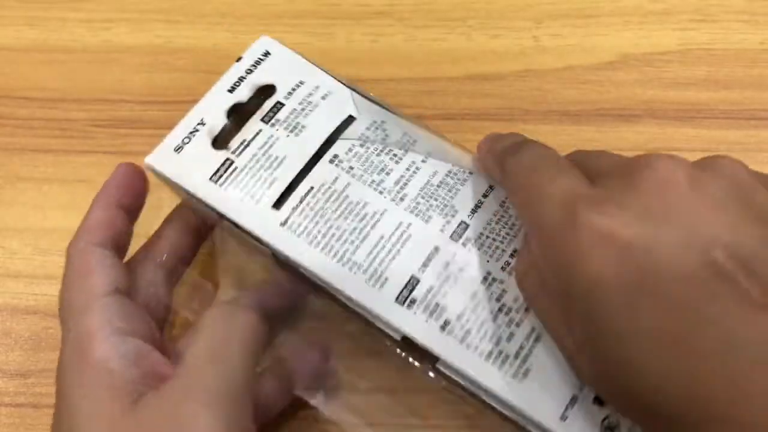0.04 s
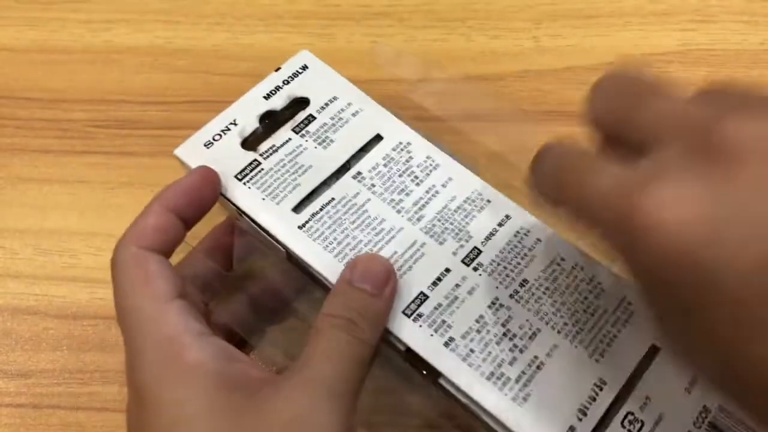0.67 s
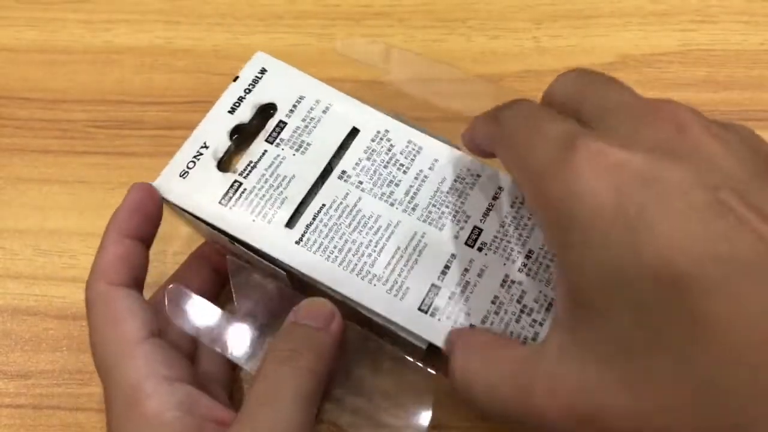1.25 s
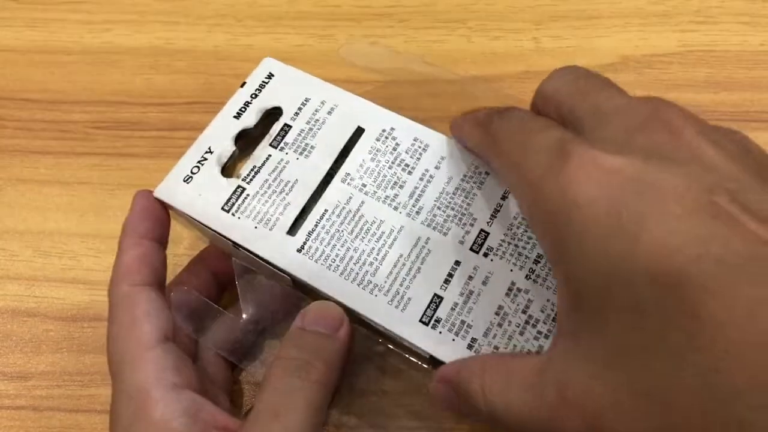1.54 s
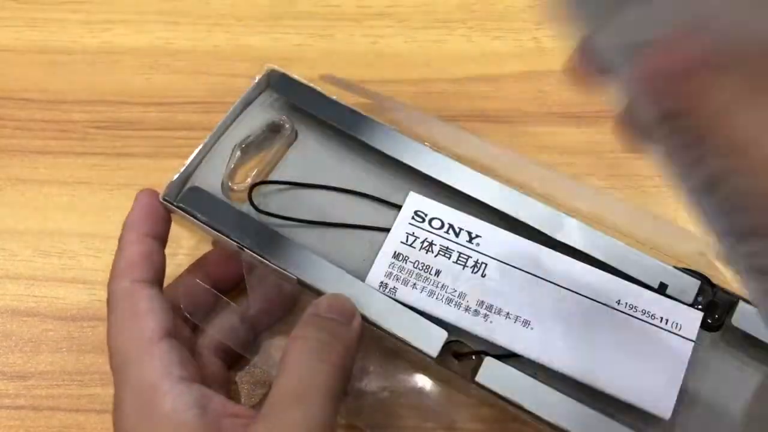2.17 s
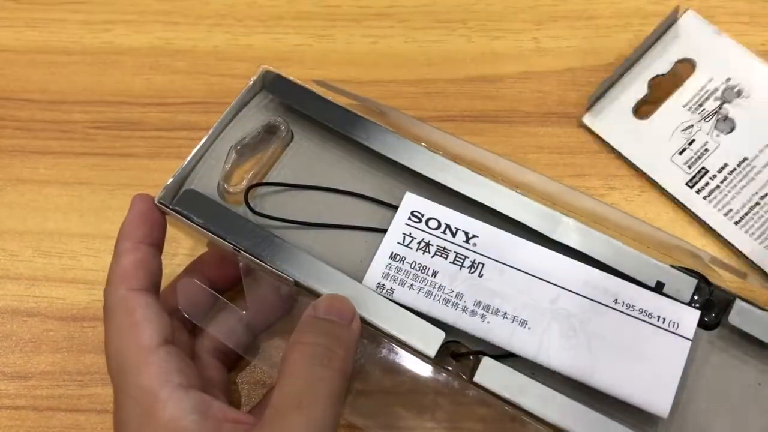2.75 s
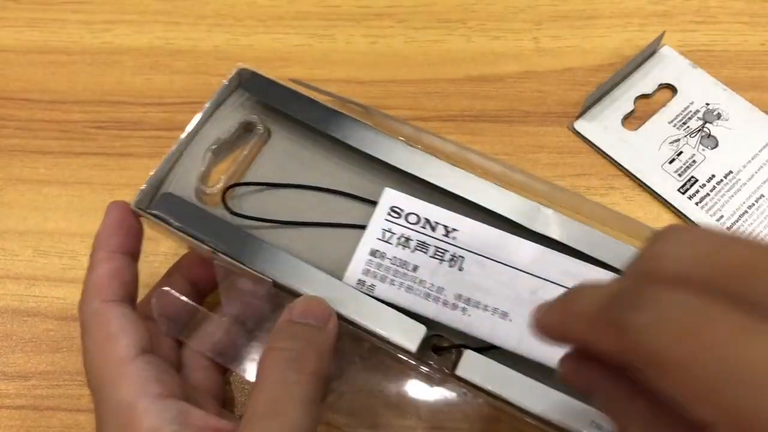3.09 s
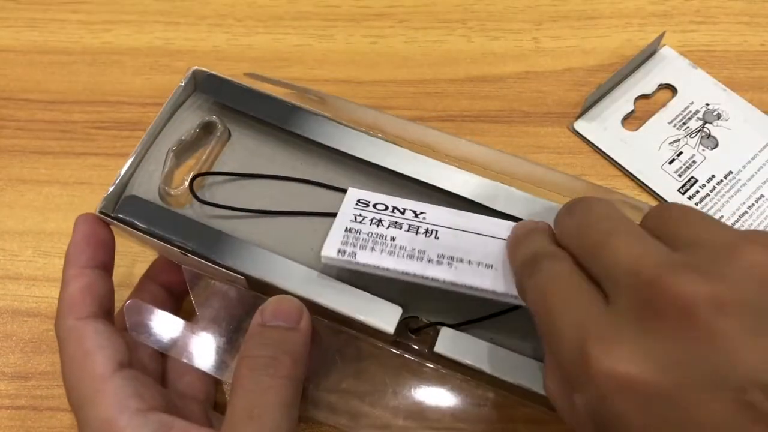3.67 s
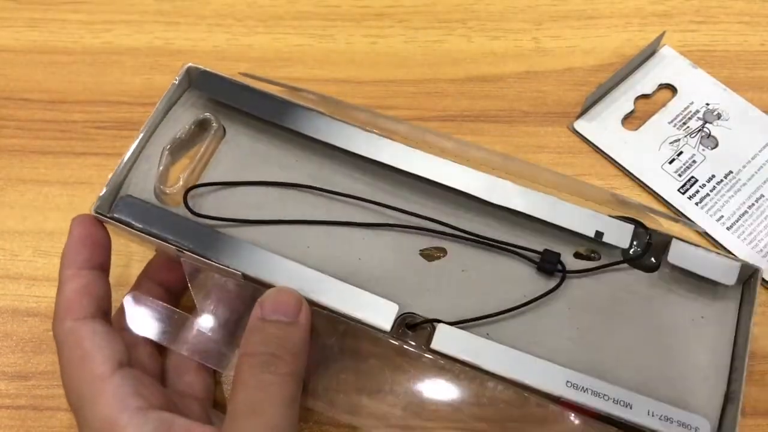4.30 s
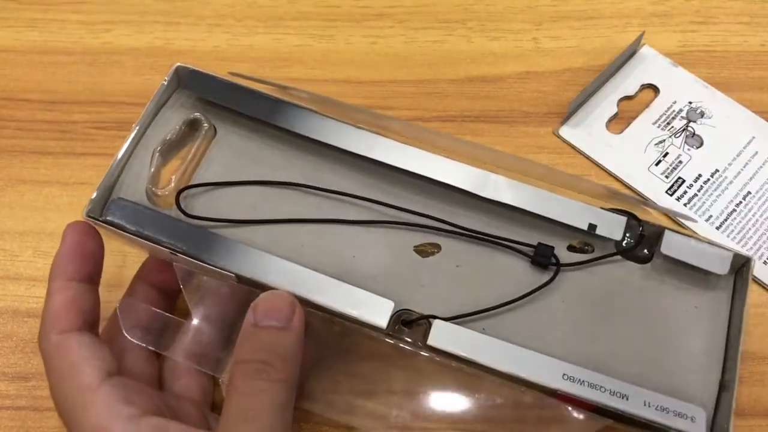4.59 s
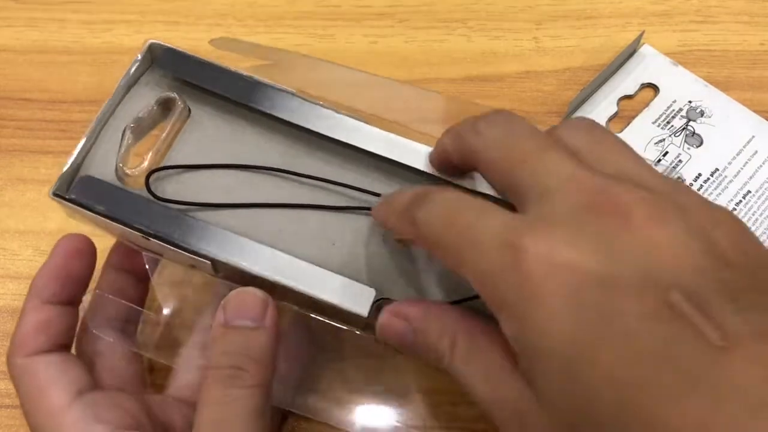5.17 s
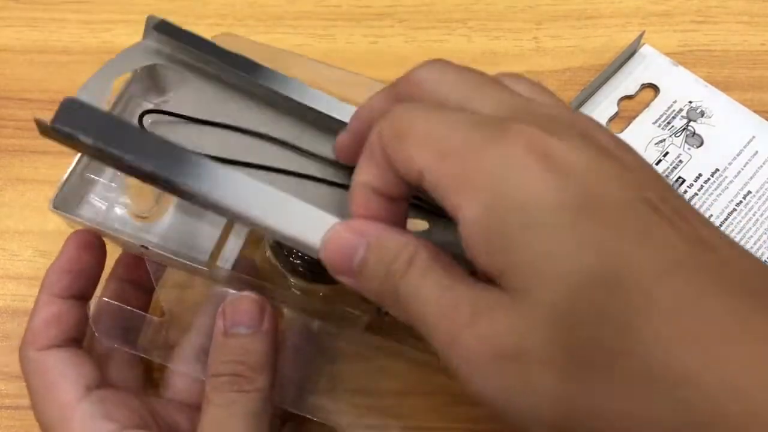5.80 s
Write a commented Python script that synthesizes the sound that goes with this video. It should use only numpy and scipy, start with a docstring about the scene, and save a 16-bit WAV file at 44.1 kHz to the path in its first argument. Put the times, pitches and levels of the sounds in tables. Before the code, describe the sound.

Hands open a stiff plastic pack on a desk, close to the microphone in a small room. For the first two seconds a backing card scrapes out in short, uneven strokes while the shell gives sharp, hollow clicks and the desk takes a few soft bumps. The loudest cluster comes at about 0.4 seconds, with a brief squeaky skid of card on plastic; another skid comes near 1.8. At 2.6 the card lands on the desk with a light slap and settles. From 3.3 to 4 a paper leaflet rustles and flicks against the tray, with crisp snaps around 3.65 and 3.8. A quieter stretch holds only faint swishes and two tiny taps. From 5 seconds to about 6, fingers tap and rub the tray, which ticks as it flexes, with a firmer knock near 5.8. Faint room rumble and mains hum continue throughout.

```python
"""Opening a blister pack, close up

A desk in a small room, one microphone close to the hands. A backing card scrapes out of a stiff plastic
shell, which clicks and rings, and is dropped aside. A paper leaflet snaps and rustles as it is lifted
out; fingers then tap and rub the tray. Faint room rumble and mains hum lie underneath."""
import sys
import numpy as np
from scipy import signal
from scipy.fft import rfft, irfft, next_fast_len
from scipy.io import wavfile
from scipy.ndimage import uniform_filter1d, map_coordinates

SR = 44100
rng = np.random.default_rng(int(sys.argv[2]) if len(sys.argv) > 2 else 0)


def inscribe(sig):
    """Save sig as 16-bit PCM at rate SR to the path in sys.argv[1].

    A 1-D sig is mono; a 2-D sig holds one channel per row.
    Samples are clipped to [-1, 1] before scaling.
    """
    pcm = np.round(np.clip(np.atleast_2d(sig).T, -1, 1) * 32767)
    wavfile.write(sys.argv[1], SR, pcm.astype(np.int16))


N = 257544

# Levels in the tables are relative: each source adds its own gains.
# room tone: f/Hz, level/dB
ROOM_TONE = [(12, -75), (20, -35), (58, -3.5), (158, -7), (255, -12.5), (337, -10), (367, -11.5),
             (410, -11), (527, -20.5), (607, -16), (923, -18), (1060, -19.5), (1150, -19.5), (1810, -24.5),
             (16000, -54.5)]
# reverberation of the small room: f/Hz, t60/s
ROOM_DECAY = [(150, 0.55), (1000, 0.66), (4000, 0.67), (9000, 0.43), (16000, .4)]
# stretches of murmur and hiss: t/s, length/s, body/dB, hiss/dB
CARD_SLIDES = [(-.02, 0.066, -46, -55.5), (.11, 0.14, -60, -65), (.315, 0.15, -48, -61),
               (.55, 0.039, -48.5, -61), (.74, 0.083, -53.5, -60), (.87, 0.063, -59, -62.5),
               (1.04, 0.055, -69, -70), (.95, 0.045, -49.5, -58.5), (1.145, .04, -51, -61),
               (1.205, 0.081, -58.5, -59.5), (1.33, .07, -66.5, -61), (1.41, 0.051, -54.5, -55),
               (1.535, .05, -55, -54.5), (1.595, 0.029, -49, -66), (1.71, 0.083, -57, -59.5),
               (1.8, .13, -51, -50), (1.98, 0.13, -65, -59), (2.085, 0.036, -49.5, -58),
               (2.24, 0.28, -89, -64.5)]  # card sliding in the shell
CARD_SKATES = [(2.595, 0.045, -55.5, -56), (2.806, 0.0099, -69, -62)]  # dropped card skating to rest on the desk
LEAFLET_RUSTLE_AND_TAILS = [(3.265, 0.12, -65.5, -59), (3.4, 0.063, -57.5, -53), (3.49, 0.097, -64, -67),
                            (3.592, 0.032, -53, -57), (3.658, 0.028, -50.5, -58.5), (3.69, 0.097, -74, -69),
                            (3.778, 0.096, -55.5, -53.5), (3.89, 0.083, -59, -66), (4.1, 0.16, -90, -64),
                            (4.3, 0.023, -85, -58), (4.365, 0.15, -80, -63)]  # paper rustle and the room's fading hiss after each snap
FINGER_RUBS = [(5.015, 0.071, -54, -67.5), (5.12, 0.05, -69, -66.5), (5.195, 0.083, -75, -59.5),
               (5.28, 0.094, -60, -57.5), (5.42, 0.029, -52, -50), (5.48, 0.03, -51.5, -79),
               (5.61, 0.033, -47, -52.5), (5.69, .06, -56.5, -55), (5.785, 0.062, -50.5, -54.5)]  # fingers rubbing the tray
# spectra of the murmur, the hisses and the sizzle: f/Hz, level/dB
RUB_BODY = [(100, -16.5), (300, -7), (600, -13.5), (950, -3), (1500, -10.5), (2200, -16), (4000, -32),
            (9000, -72)]
CARD_HISS = [(900, -14), (2000, -8.5), (3200, -1), (5200, -5), (7500, -8.5), (11000, -12), (16000, -14.5)]
PAPER_HISS = [(900, -24), (2200, -8), (4200, -4.5), (6200, -6.5), (8500, -13.5), (12000, -16),
              (16000, -17.5)]
FINGER_HISS = [(900, -12), (2000, -0.5), (3200, -5.5), (5000, 5.5), (7500, -3.5), (11000, -11.5),
               (16000, -15)]
SIZZLE = [(3000, -25), (6500, -0.5), (8500, -5), (11000, -6.5), (15500, -10.5)]
# hard contacts: t/s, nominal length/s, knock/dB, crack/dB, sizzle/dB
SHELL_CLICKS = [(.0635, 0.0013, -41, -66, -76), (.2315, 0.0012, -43.5, -45.5, -61),
                (.3225, 0.0014, -36, -41.5, -68), (.3315, 0.0011, -37.5, -40.5, -72),
                (.4037, 0.0013, -31.5, -29.5, -48), (.41, 0.0027, -38, -46, -47.5),
                (.4185, 0.0027, -24.5, -32, -52), (.4225, 0.0035, -27.5, -47, -48),
                (.576, 0.0042, -49, -49, -65), (.7154, 0.00086, -49.5, -50, -66),
                (.773, 0.0018, -34.5, -42, -64.5), (.7818, 0.0015, -40.5, -53, -67),
                (.9384, 0.0014, -39, -44, -78), (1.0312, 0.00056, -44.5, -58.5, -83),
                (1.1595, 0.004, -39.5, -51.5, -68), (1.247, 0.0031, -39.5, -62, -67.5),
                (1.3385, .0019, -58, -57, -74), (1.524, 0.0018, -35.5, -57, -73),
                (1.5555, .001, -65, -54, -66), (1.5899, 0.0051, -42, -60, -72),
                (1.607, 0.0055, -37.5, -73, -73), (1.6677, .001, -51, -59.5, -73),
                (1.751, 0.0046, -63, -50.5, -67.5), (1.895, 0.0019, -37, -50, -63),
                (1.9012, 0.0034, -48, -42.5, -49.5), (2.1275, 0.0027, -37, -45, -53)]  # card and fingers against the shell
CARD_LANDINGS = [(2.5727, 0.0011, -59, -55.5, -60), (2.5903, 0.0021, -40.5, -38, -43.5),
                 (2.8011, 0.0019, -49, -51.5, -54.5)]  # card on the desk
LEAFLET_FLICKS = [(3.266, 0.0005, -66, -62, -61), (3.2728, 0.0016, -46, -52, -60.5),
                  (3.4402, 0.0018, -46, -45, -55), (3.6502, .002, -42, -35, -47.5),
                  (3.662, 0.0055, -58, -50.5, -56.5), (3.8205, .0007, -40.5, -28.5, -39.5)]  # leaflet flicking against the tray
FINGER_TAPS = [(4.379, 0.0014, -60, -58, -69.5), (4.5232, 0.0022, -61, -59, -71),
               (5.063, .0018, -53, -60, -69.5), (5.0905, 0.0022, -48.5, -55, -68),
               (5.278, 0.0013, -53, -61, -63.5), (5.3723, 0.001, -48.5, -50.5, -63.5),
               (5.406, .0006, -42.5, -56, -81), (5.4162, 0.00087, -52, -58, -70),
               (5.5479, 0.0012, -47.5, -56.5, -76), (5.6033, 0.00079, -49.5, -56, -63),
               (5.6252, 0.003, -44, -50.5, -60), (5.6926, .002, -56, -55.5, -64.5),
               (5.7664, .0008, -53, -49.5, -64), (5.8315, 0.004, -34, -48, -71)]  # fingertips on the opened tray
# spans in which the hands flex the shell: start/s, end/s
FLEX_SPANS = [(0.051, 2.05), (5.05, 6.3)]
# one faint tick of the flexed shell: nominal length/s, knock/dB, crack/dB, sizzle/dB
FLEX_TICK = (0.2, -57.5, -62.5, -74)
# resonances of the hollow pack, its stiff walls and the card: f/Hz, width/Hz, level/dB
HOLLOW_MODES = [(379, 186, 0), (849, 215, 2), (1003, 185, 1), (1626, 600, -2.5), (1890, 610, -5)]
SHELL_MODES = [(2290, 770, -0.5), (2850, 780, 3), (4050, 2300, -2.5), (5960, 2900, -8.5)]
TRAY_MODES = [(2180, 280, -5), (2780, 150, -1.5), (3700, 270, 2), (4220, 540, 0.5), (5650, 390, 3),
              (7370, 1100, -18.5)]
CARD_MODES = [(1740, 240, -2), (2360, 370, 2), (3450, 460, 4), (5000, 1500, -3.5)]
# soft bumps on the desk: t/s, level/dB, f/Hz
DESK_BUMPS = [(0.326, -42.5, 298), (.424, -42, 492), (.435, -36, 123), (.488, -40.5, 182), (.778, -45, 265),
              (1.159, -48.5, 398), (1.401, -49.5, 187), (1.524, -52, 439), (2.594, -45.5, 148),
              (3.653, -55, 273), (5.026, -55, 266)]
# card edge skidding along the plastic rim: t/s, length/s, level/dB, f/Hz
RIM_SKIDS = [(0.336, 0.053, -44.5, 3020), (0.372, 0.0092, -34, 2980), (0.382, 0.017, -45, 2800),
             (1.827, 0.021, -37.5, 3250), (1.839, 0.021, -34.5, 3020), (1.849, 0.046, -44, 1990)]
# skin and paper gliding over the pack: t/s, length/s, level/dB, f/Hz
GLIDES = [(1.172, 0.1, -60, 5000), (1.205, 0.053, -57, 3100), (1.38, 0.083, -65, 5000),
          (2.125, 0.081, -58, 5740), (3.06, .1, -55.5, 900), (3.312, .05, -58, 6140),
          (3.384, .12, -63, 6550), (3.585, .056, -53.5, 3950), (3.593, 0.049, -56, 5950),
          (4.415, 0.11, -62.5, 8060), (4.543, 0.037, -60.5, 4550), (5.61, .049, -46, 1210)]


def amp(db):
    """Decibels to gain."""
    return 10 ** (np.asarray(db) / 20)


def unit(x):
    """Scale to rms 1."""
    return x / np.sqrt(np.mean(x ** 2) + 1e-20)


def at_energy(x, db):
    """Scale a short sound so that its energy equals 10 ms at db."""
    return amp(db) * x * np.sqrt(SR / 100 / (np.sum(x ** 2) + 1e-20))


def along(points, hz):
    """Read (f/Hz, value) points on a log frequency axis."""
    f, values = np.transpose(points)
    return np.interp(np.log(hz + 1), np.log(f + 1), values)


def filtered(x, response):
    """Pass x through a response given as a function of frequency."""
    size = next_fast_len(len(x) + 1024)
    return irfft(rfft(x, size) * response(np.fft.rfftfreq(size, 1 / SR)), size)[:len(x)]


def coloured(x, spectrum):
    """Give x a spectrum, at rms 1."""
    return unit(filtered(x, lambda hz: amp(along(spectrum, hz))))


def resonate(x, modes):
    """Ring parallel resonances of alternating polarity."""
    return filtered(x, lambda f: sum(
        (-1) ** k * amp(db) * 1j * f * width / (hz * hz - f * f + 1j * f * width)
        for k, (hz, width, db) in enumerate(modes)))


def wobble(rate):
    """A smooth random curve with rate knots a second."""
    return map_coordinates(rng.standard_normal(int(N * rate / SR) + 4), [np.arange(N) * rate / SR])


def add(track, s, sound):
    """Mix a sound into the track at time s."""
    start = int(np.clip(round(s * SR), 0, N - 1))
    track[start:start + len(sound)] += sound[:N - start]


def at_microphone(x, wet_db, desk_db, direct=1):
    """The close microphone hears the direct sound, scatter off desk and hands, and the room's tail."""
    hz, t, noise = signal.stft(rng.standard_normal(int(SR * .32)), SR, nperseg=256)
    decay = amp(-60 * t / along(ROOM_DECAY, hz)[:, None])
    tail = signal.istft(noise * decay, SR, nperseg=256)[1]
    t = np.arange(len(tail)) / SR
    tail *= 1 - np.exp(-t / 0.0027)
    near = rng.standard_normal(len(t)) * t * np.exp(-t / 0.0036)
    response = amp(wet_db) * tail / np.linalg.norm(tail) + amp(desk_db) * near / np.linalg.norm(near)
    response[0] += direct
    return signal.fftconvolve(x, response)


def room_tone(rumble_db, hum_db):
    """The room's steady rumble and a slightly wavering 100 Hz mains hum."""
    rumble = amp(rumble_db) * coloured(rng.standard_normal(N), ROOM_TONE)
    hum = np.sqrt(2) * np.sin(2 * np.pi * 100 * np.arange(N) / SR)
    return rumble + amp(hum_db + 1.7 * wobble(4)) * hum


def stroke_gains(rows, rise_share=0.2, release_s=0.018):
    """Body and hiss gain over time: each stroke rises, holds and dies away."""
    t, power = np.arange(N) / SR, np.zeros((2, N))
    for s, length, *levels_db in rows:
        rise = np.clip((t - s) / (rise_share * length), 0, 1)
        release = np.exp(-np.clip((t - s - length) / release_s, 0, 20))
        power += (amp(levels_db)[:, None] * rise * release) ** 2
    return np.sqrt(power)


def wander(x, depth_db):
    """The colour of a rub shifts as the contact wanders."""
    spectra = signal.stft(x, nperseg=512)[2]
    patches = rng.standard_normal(spectra.shape)
    for _ in range(2):
        patches = uniform_filter1d(uniform_filter1d(patches, size=7, axis=0), size=9, axis=1)
    return signal.istft(spectra * amp(depth_db * unit(patches)), nperseg=512)[1][:N]


def friction(rows, hiss_spectrum, grains_per_s, grain_share, uneven_db, body_db, hiss_db):
    """Sliding surfaces catch on tiny bumps: a grainy hiss, and a murmur from the pack beneath."""
    body_gain, hiss_gain = stroke_gains(rows)
    pressure = amp(uneven_db * wobble(70))
    catches = (rng.random(N) < grains_per_s / SR) * rng.random(N) ** 2
    decays = signal.lfilter([1], [1, -np.exp(-1 / (SR * 0.00098))], catches)
    grains = unit(decays * rng.standard_normal(N))
    drive = np.sqrt(grain_share) * grains + np.sqrt(1 - grain_share) * rng.standard_normal(N)
    hollow = unit(resonate(rng.standard_normal(N), HOLLOW_MODES))
    murmur = amp(body_db) * body_gain * unit(coloured(drive, RUB_BODY) + 0.48 * hollow)
    rustle = amp(hiss_db) * hiss_gain * coloured(wander(drive, depth_db=2.2), hiss_spectrum)
    return at_microphone(pressure * (murmur + rustle), wet_db=-7.5, desk_db=-34)[:N]


def contacts(rows, wall_modes, snap, linger, knock_hz, lead_in_db, knock_db, crack_db, sizzle_db,
             wet_db, desk_db, far_faces):
    """A snap and a burst of tiny slips ring the hollow pack and its stiff walls."""
    lead_s, hardness_db_per_octave = 0.012, 113
    track, t = np.zeros(N), np.arange(-round(lead_s * SR), 1536) / SR

    def burst(life_s):
        """A faint noise swells just before the click; the slips after it die within a few life_s."""
        age = np.abs(t) / life_s
        shape = np.where(t < 0, amp(lead_in_db) * np.exp(t / 0.0036), np.sqrt(age) * np.exp(-age))
        noise = rng.standard_normal(len(t)) * shape
        return noise / np.linalg.norm(noise) + snap * (t == 0)

    def strike(length, knock, crack, sizzle):
        """One face's sound: the harder the crack against the knock, the higher the modes it favours."""
        favoured_hz = knock_hz * 2 ** ((crack - knock) / hardness_db_per_octave)
        push = burst(length * linger) * (t >= 0)  # the knock has no lead-in
        push = resonate(push, [(favoured_hz, 760, 0)])
        body = at_energy(resonate(push, HOLLOW_MODES), knock + knock_db)
        wall = at_energy(resonate(burst(length * 0.69), wall_modes), crack + crack_db)
        edge = at_energy(coloured(burst(length * 0.74), SIZZLE), sizzle + sizzle_db)
        return body + wall + edge

    for s, *contact in rows:
        add(track, s - lead_s, strike(*contact))
        for _ in range(far_faces):  # faces turned from the microphone reach it only by reflection
            reflected = at_microphone(strike(*contact), wet_db, desk_db, direct=0)
            add(track, s - lead_s, reflected / np.sqrt(far_faces))
    return track


def flex_ticks(per_s=7, spread_db=3):
    """Contact rows for the shell ticking faintly at random as the hands flex it."""
    times = [s for start, end in FLEX_SPANS for s in rng.uniform(start, end, int(per_s * (end - start)))]
    length, *levels_db = FLEX_TICK
    return [(s, length, *(levels_db + spread_db * rng.uniform(-0.81, 1, 3))) for s in times]


def desk_bumps(decay_s, gain_db):
    """Soft contacts ring three modes of the desk top for a few cycles."""
    track, t = np.zeros(N), np.arange(4096) / SR
    for s, db, hz in DESK_BUMPS:
        phase = 2 * np.pi * hz * t
        ring = np.sin(phase) + 0.25 * np.sin(0.76 * phase) + 0.5 * np.sin(1.235 * phase)
        thud = ring * np.exp(-t / decay_s) * (1 - np.exp(-t / 0.0012))
        add(track, s, at_microphone(at_energy(thud, db + gain_db), wet_db=-13.5, desk_db=-18))
    return track


def rim_skids(fizz_db, rasp_db, gain_db):
    """The card edge chatters through a narrow resonance and its overtone as it slips along the rim."""
    track = np.zeros(N)
    for s, length, db, hz in RIM_SKIDS:
        size = int(length * SR)
        chatter = rng.standard_normal(size) * amp(2 * rng.standard_normal(size))
        squeak = unit(resonate(chatter, [(hz, 650, 0), (1.94 * hz, 700, -11)]))
        rasp = amp(rasp_db) * unit(resonate(chatter, SHELL_MODES))
        fizz = amp(fizz_db) * coloured(chatter, SIZZLE)
        skid = amp(db + gain_db) * unit(squeak + rasp + fizz) * signal.windows.tukey(size, .4)
        add(track, s, at_microphone(skid, wet_db=-31, desk_db=-18.5))
    return track


def glides(relative_width, gain_db):
    """Skin and paper glide over the pack: a whisper swells and fades in one narrow resonance."""
    track = np.zeros(N)
    for s, length, db, hz in GLIDES:
        size = int(length * SR)
        band = [(hz, hz * relative_width, 0)]
        whisper = unit(resonate(resonate(rng.standard_normal(size), band), band))
        swish = amp(db + gain_db) * whisper * signal.windows.tukey(size, .6)
        add(track, s, at_microphone(swish, wet_db=-8.5, desk_db=-30))
    return track


def desk_rumble(start_s, level_db):
    """The hand settling on the tray makes the desk rumble softly from start_s on."""
    weight = np.interp(np.arange(N) / SR, [start_s, start_s + 0.13], [0, 1])
    rumble = resonate(rng.standard_normal(N), [(62, 12, -2.5), (110, 52, -9)])
    return amp(level_db) * weight * unit(rumble)


def scene():
    """All the handling at the desk, close and in mono, over the room tone."""
    clicks = contacts(SHELL_CLICKS + flex_ticks(), SHELL_MODES, snap=0.32, linger=0.91, knock_hz=1290,
                      lead_in_db=-21, knock_db=-2, crack_db=-0.5, sizzle_db=8.5,
                      wet_db=-14.5, desk_db=-12, far_faces=1)
    taps = contacts(FINGER_TAPS, SHELL_MODES, snap=0.38, linger=0.99, knock_hz=1510,
                    lead_in_db=-17, knock_db=-2.5, crack_db=-1.5, sizzle_db=7,
                    wet_db=-10.5, desk_db=-11.5, far_faces=1)
    landing = contacts(CARD_LANDINGS, CARD_MODES, snap=0.55, linger=1.2, knock_hz=1240,
                       lead_in_db=-24, knock_db=0, crack_db=1, sizzle_db=2,
                       wet_db=-10.5, desk_db=-10, far_faces=3)
    flicks = contacts(LEAFLET_FLICKS, TRAY_MODES, snap=0.49, linger=1.9, knock_hz=1490,
                      lead_in_db=-29, knock_db=-1.5, crack_db=0.5, sizzle_db=2,
                      wet_db=-18.5, desk_db=-15.5, far_faces=2)
    slide = friction(CARD_SLIDES, CARD_HISS, grains_per_s=220, grain_share=0.33,
                     uneven_db=0, body_db=-0.5, hiss_db=-4)
    skate = friction(CARD_SKATES, CARD_HISS, grains_per_s=770, grain_share=0.13,
                     uneven_db=8, body_db=-2, hiss_db=-4)
    leaflet = friction(LEAFLET_RUSTLE_AND_TAILS, PAPER_HISS, grains_per_s=160, grain_share=0.2,
                       uneven_db=1.5, body_db=-4.5, hiss_db=-3)
    grip = friction(FINGER_RUBS, FINGER_HISS, grains_per_s=160, grain_share=0.37,
                    uneven_db=3.5, body_db=-4, hiss_db=-2.5)
    desk = desk_bumps(decay_s=0.016, gain_db=-1) + desk_rumble(start_s=5.18, level_db=-61)
    slips = rim_skids(fizz_db=-5, rasp_db=-24, gain_db=-1.5) + glides(relative_width=0.18, gain_db=-5)
    room = room_tone(rumble_db=-58.5, hum_db=-73)
    return (clicks + taps + landing + flicks + slide + skate + leaflet + grip + desk + slips + room)[None]


def record(dry):
    """The recorder cuts off steeply above 16 kHz."""
    return np.array([filtered(channel, lambda hz: 1 / np.sqrt(1 + (hz / 16000) ** 160))
                     for channel in dry])


dry = scene()
out = record(dry)
inscribe(out)
```